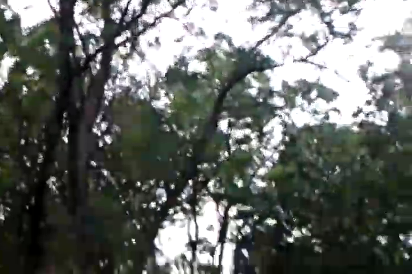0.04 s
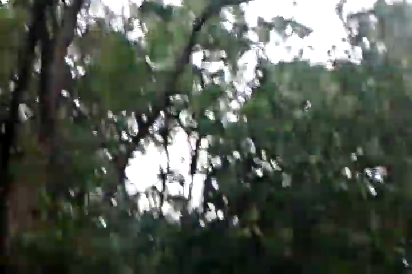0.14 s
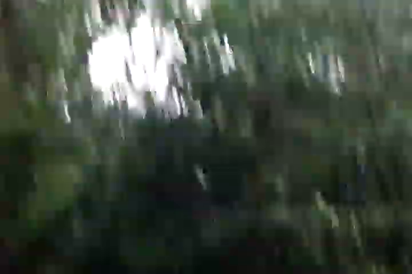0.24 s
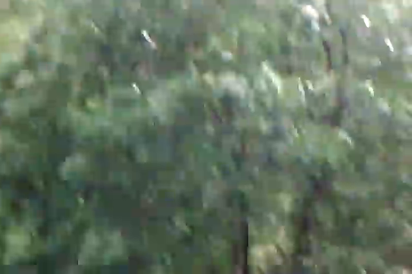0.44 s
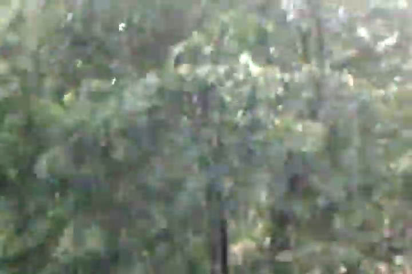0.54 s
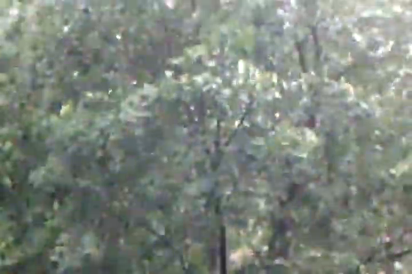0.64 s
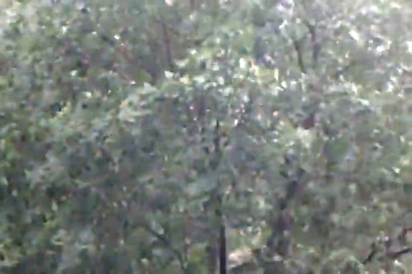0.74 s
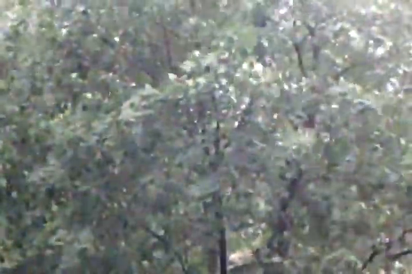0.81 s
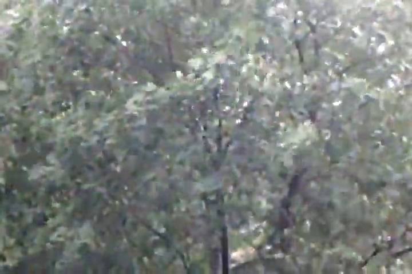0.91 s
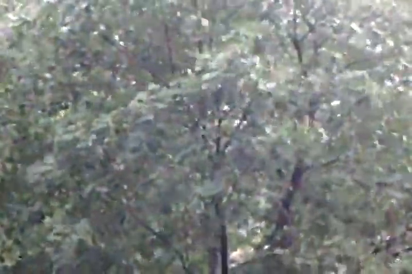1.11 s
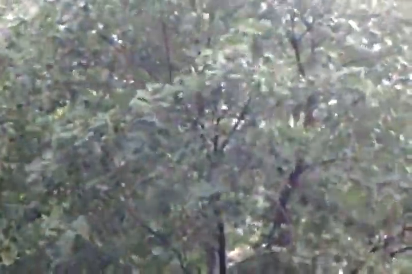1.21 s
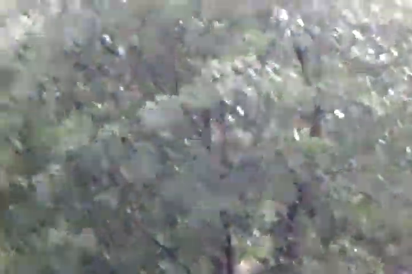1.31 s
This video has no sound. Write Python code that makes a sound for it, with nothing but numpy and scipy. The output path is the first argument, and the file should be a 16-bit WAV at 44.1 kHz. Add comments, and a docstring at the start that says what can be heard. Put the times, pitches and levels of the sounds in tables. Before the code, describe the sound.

Heavy rain falls on leafy trees as a constant soft wash with fine patter; early on, fingers rustle and knock the plastic housing of the handheld microphone, one hard click distorting, then only rain continues.

```python
"""Heavy rain on trees, heard by a small hand-held camera that is swung round early on.
Far drops merge into a wash of banded noise; nearer ones patter on leaves as short random resonances.
A faint hum, made of narrowband noise, wavers beneath. During the swing the plastic housing rustles
under the fingers (dense tiny resonances), knocks dully (short sagging tones) and ticks (struck modes
with a burst of bright noise); the hardest tick overloads the input."""
import sys
import numpy as np
from scipy import signal
from scipy.io import wavfile

SR = 44100
rng = np.random.default_rng(int(sys.argv[2]) if len(sys.argv) > 2 else 0)


def to_wav(sig):
    """Store sig (one row per channel, or 1-D mono) as 16-bit WAV at the path in sys.argv[1].

    Samples outside -1..1 are clipped; the rate is SR.
    """
    pcm = np.clip(np.atleast_2d(sig), -1, 1) * 32767
    pcm = np.round(pcm).astype(np.int16)
    wavfile.write(sys.argv[1], SR, pcm.T)  # frames by channels


N = 59535

# Spectrum of the far rain. Each row: frequency in Hz, relative density in dB per Hz.
WASH_SPECTRUM = [(40, -42), (80, -2.5), (110, -10), (160, -11), (240, -6), (330, -6), (500, -1.5),
                 (650, -3), (950, -5), (1500, -10), (2300, -13), (3300, -12), (4700, -14.5), (6300, -22.5),
                 (8300, -16.5), (11500, -24), (13000, -27), (14400, -34)]
# Level of the wash over time. Each row: time in seconds, level in dB.
RAIN_LEVEL = [(0.0, -37), (0.202, -35.5), (0.322, -33.5), (0.946, -36), (1.35, -35)]
# Resonances of the hum. Each row: frequency in Hz, bandwidth of one pass in Hz, level in dB.
HUM_RESONANCES = [(116.8, 7.4, -54.5), (240.4, 10.5, -52)]
# Rustle of the grip over time. Each row: time in seconds, level in dB.
GRIP_LEVEL = [(0.17, -41), (0.2, -40.5), (0.225, -34), (0.25, -23.5), (0.29, -34.5), (0.32, -39),
              (0.342, -26.5), (0.37, -49.5), (0.41, -35.5), (0.45, -36.5), (0.52, -51), (0.6, -76)]
# Dull knocks on the housing. Each row: crest time in seconds, peak in dB, pitch at the crest in Hz,
# swell in seconds, fade in seconds, pitch fall in octaves per second.
KNOCK_EVENTS = [(0.192, -27.5, 610, 0.0041, 0.011, 19), (0.2335, -18, 635, 0.0014, 0.0018, 20),
                (0.2568, -8, 830, .0016, .0016, 70), (0.2257, -13, 600, .003, .0022, 150),
                (0.2435, -20, 750, .0025, .0025, 30), (0.2665, -26, 700, .002, .002, 30),
                (0.271, -24, 750, .0025, .0025, 30), (0.298, -26, 750, .002, .002, 30),
                (0.3344, -14, 520, .0018, .0045, 390), (0.3968, -13, 640, .005, .0026, 320),
                (0.4512, -10.5, 580, .0016, .0022, 330), (0.35, -23.5, 427, 0.0052, 0.0045, 33),
                (0.4549, -23, 473, 0.003, 0.0038, 60), (0.4672, -17.5, 790, .0022, 0.0013, 30)]
# Sharp ticks of the housing. Each row: start in seconds, strength in dB, favoured pitch in Hz,
# loss in dB per squared octave away from that pitch, snap strength in dB.
TICK_EVENTS = [(0.2125, -22, 2500, 14, -45), (0.223, -17, 2500, 28, -45), (0.3307, -14, 2550, 20, -48),
               (0.3461, -17, 3900, 12, -45), (0.354, -27, 4500, 15, -45), (0.2375, -2.5, 2500, 16, -35),
               (0.2378, -3, 4700, 18, -45), (0.2541, 8, 1860, 10.5, -24), (0.255, -0.5, 3630, 20, -45),
               (0.3797, -13, 5000, 16, -37.5), (0.38, -14.5, 1500, 16, -49.5), (0.3934, -17, 2900, 9, -42),
               (0.4673, -16.5, 3200, 1, -30), (0.4708, -20, 3600, 12, -45), (0.4724, -11, 5000, 10, -17),
               (0.4725, -10.5, 1850, 20, -43), (0.7525, -20, 2900, 10, -45), (0.7546, -21, 1290, 14, -50)]
# Modes of the housing. Each row: frequency in Hz, relative strength in dB, 60 dB decay time in seconds.
HOUSING_MODES = [(790, -46, 0.015), (1377, -1, 0.0053), (2286, -2, 0.0043), (2744, -10, 0.012),
                 (3456, -5, 0.0027), (4410, -6, 0.0034), (5580, -17.5, 0.0048), (7550, -39, 0.0023)]

FLICKER_DB, FLICKER_HZ = 1.0, 26.0   # each band's own flicker
SHARED_FLICKER, SHARED_FLICKER_HZ = 0.2, 6   # flicker common to all bands, relative to their own
# cycles: length of a grain's 60 dB decay; tilt: gain change from lowest to highest pitch
DROPS_PER_S, DROP_SPREAD_DB, DROP_CYCLES = 2500, 4, 9.4
PATTER_LOW_HZ, PATTER_HIGH_HZ, PATTER_TILT_DB = 304, 5760, -7
PATTER_DB = -14.5   # relative to the wash
SLIPS_PER_S, SLIP_SPREAD_DB, SLIP_CYCLES = 7000, 1.0, 6.8
GRIP_LOW_HZ, GRIP_HIGH_HZ, GRIP_TILT_DB = 286, 3400, 11.5
THUD_HZ, THUD_T60_S, THUD_DRIVE_DB = 292, 0.0098, -38   # hollow of the housing
SNAP_HZ, SNAP_S = 5070, 0.00027   # highpass corner and decay constant of a tick's noise
BASS_CUT_HZ, CUTOFF_HZ, CLIP_LEVEL = 157.7, 14350, 1.0


def from_db(db):
    """Decibels express the logarithm of an amplitude ratio."""
    return 10 ** (np.asarray(db) / 20)


def rms_one(x):
    """Normalisation: mean power is brought to one."""
    return x / np.sqrt(np.mean(x ** 2) + 1e-20)


def in_time(rows):
    """Linear interpolation between breakpoints, the end values being held."""
    times, values = np.transpose(rows)
    return np.interp(np.arange(N) / SR, times, values)


def drift(rate_hz):
    """Lowpass-filtered noise wanders slowly and at random; rms 1."""
    step = 40   # samples between computed points
    pole = np.exp(-2 * np.pi * rate_hz * step / SR)
    noise = rng.standard_normal(N // step + 2002)
    slow = signal.lfilter([1], [1, -2 * pole, pole ** 2], noise)[2000:]   # drop the settling
    return np.interp(np.arange(N) / step, np.arange(len(slow)), rms_one(slow))


def ring(drive, hz, t60):
    """Damped resonator: a unit click sets off a decaying sine of height about 1."""
    radius = from_db(-60 / (t60 * SR))
    angle = 2 * np.pi * hz / SR
    feedback = [1, -2 * radius * np.cos(angle), radius ** 2]
    return signal.lfilter([0, np.sin(angle)], feedback, drive + 1e-18)


def grains(per_s, spread_db, cycles, low_hz, high_hz, tilt_db, count=24):
    """Shot noise: random uneven clicks excite short resonators spaced evenly in log pitch; rms 1."""
    sizes = from_db(spread_db * np.minimum(rng.exponential(1, N), 4))
    signs = rng.choice([-1, 1], N)
    born = rng.random(N) < per_s / SR
    clicks = signs * sizes * born
    dealt = rng.integers(0, count, N)   # which resonator each click strikes
    pitches = np.geomspace(low_hz, high_hz, count)
    gains = from_db(np.linspace(0, tilt_db, count))
    out = np.zeros(N)
    for k, (hz, gain) in enumerate(zip(pitches, gains)):
        out += gain * ring(clicks * (dealt == k), hz, cycles / hz)
    return rms_one(out)


def wash():
    """Superposition of countless far drops tends to noise, here third-octave bands that flicker; rms 1."""
    together = drift(SHARED_FLICKER_HZ)
    edges = 40 * 2 ** np.arange(0, 8.7, 1 / 3)
    white = rng.standard_normal((2, N + 8000))   # neighbouring bands use different noise
    hz, db = np.transpose(WASH_SPECTRUM)
    out = np.zeros(N)
    for k, (low, high) in enumerate(zip(edges, edges[1:])):
        bandpass = signal.butter(2, [low, high], "band", fs=SR, output="sos")
        band = signal.sosfilt(bandpass, white[k % 2])[-N:]
        level_db = np.interp(np.log(low * high) / 2, np.log(hz), db)   # at the band's centre
        flicker_db = FLICKER_DB * (SHARED_FLICKER * together + drift(FLICKER_HZ))
        out += from_db(level_db + flicker_db) * band
    return rms_one(out)


def patter():
    """Impact excitation: each nearer drop on a leaf sets off a brief resonance."""
    return from_db(PATTER_DB) * grains(DROPS_PER_S, DROP_SPREAD_DB, DROP_CYCLES,
                                       PATTER_LOW_HZ, PATTER_HIGH_HZ, PATTER_TILT_DB)


def rain():
    """Addition of near and far drops under one common level."""
    near = patter()
    far = wash()
    return from_db(in_time(RAIN_LEVEL)) * (far + near)


def hum():
    """Narrowband noise: two passes through a resonance leave a tone that wavers."""
    out = np.zeros(N)
    for hz, width_hz, db in HUM_RESONANCES:
        t60 = np.log(1000) / (np.pi * width_hz)   # bandwidth fixes the decay time
        noise = rng.standard_normal(N + SR)
        tone = ring(ring(noise, hz, t60), hz, t60)[SR:]   # drop the build-up
        out += from_db(db) * rms_one(tone)
    return out


def grip():
    """Stick-slip friction: fingers on the housing make a dense run of tiny slips, each ringing briefly."""
    slips = grains(SLIPS_PER_S, SLIP_SPREAD_DB, SLIP_CYCLES, GRIP_LOW_HZ, GRIP_HIGH_HZ, GRIP_TILT_DB)
    return from_db(in_time(GRIP_LEVEL)) * slips


def knocks():
    """Forced response: a few cycles swell and fade as their pitch sags, and the hollow rings on."""
    t = np.arange(N) / SR
    out = np.zeros(N)
    for crest, db, hz, swell, fade, fall in KNOCK_EVENTS:
        since = np.clip(t - crest, -swell, fade)
        shape = np.cos(np.pi / 2 * since / np.where(since < 0, swell, fade)) ** 2
        sag = np.log(2) * fall   # octaves to natural-log rate
        cycles = hz * (1 - np.exp(-sag * since)) / sag   # integral of the falling pitch
        out += from_db(db) * shape * np.cos(2 * np.pi * cycles)
    return out + from_db(THUD_DRIVE_DB) * ring(out, THUD_HZ, THUD_T60_S)


def ticks():
    """Modal excitation: a strike drives all modes, most those near its favoured pitch, with a bright snap."""
    start, db, favoured_hz, loss_db, snap_db = np.transpose(TICK_EVENTS)
    at = (start * SR).astype(int)
    luck_db = rng.normal(0, 1.0, (len(at), len(HOUSING_MODES)))
    clicks = np.zeros(N)

    clicks[at] = from_db(snap_db)
    envelope = signal.lfilter([1], [1, -np.exp(-1 / (SNAP_S * SR))], clicks + 1e-18)
    burst = envelope * rng.standard_normal(N)
    out = signal.sosfilt(signal.butter(2, SNAP_HZ, "high", fs=SR, output="sos"), burst)

    for k, (hz, mode_db, t60) in enumerate(HOUSING_MODES):
        distance_loss_db = np.abs(loss_db) * np.log2(hz / favoured_hz) ** 2
        clicks[at] = from_db(db + mode_db + luck_db[:, k] - distance_loss_db)
        out += (-1) ** k * ring(clicks, hz, t60)   # modes alternate in sign
    return out


def scene():
    """Linear superposition of all sources, in one channel."""
    rustle = grip()
    return (rain() + hum() + ticks() + knocks() + rustle)[None]


def record(dry):
    """Input overload: the bass is rolled off, peaks are clipped flat, then the top is cut."""
    bass_cut = signal.butter(4, BASS_CUT_HZ, "high", fs=SR, output="sos")
    thin = signal.sosfilt(bass_cut, dry)
    clipped = np.clip(thin, -CLIP_LEVEL, CLIP_LEVEL)
    top_cut = signal.ellip(10, 0.5, 60, CUTOFF_HZ, fs=SR, output="sos")
    return signal.sosfilt(top_cut, clipped)


dry = scene()
out = record(dry)
to_wav(out)
```